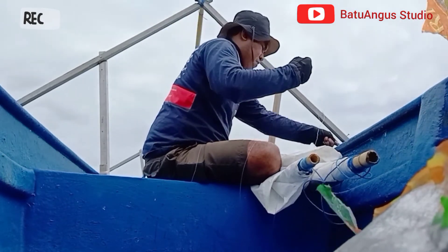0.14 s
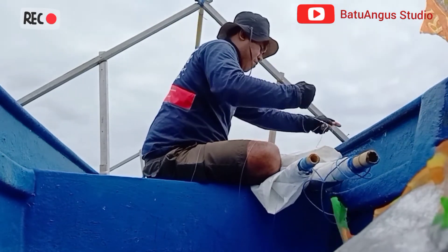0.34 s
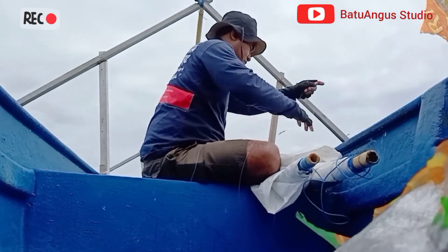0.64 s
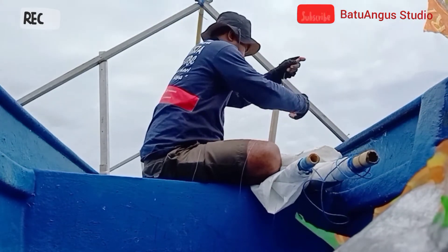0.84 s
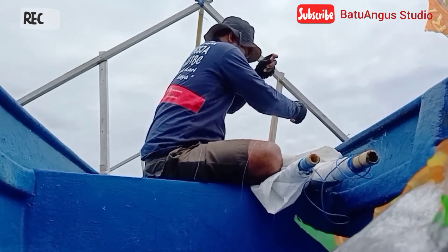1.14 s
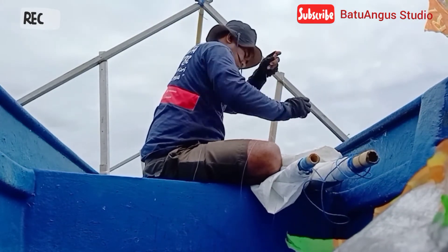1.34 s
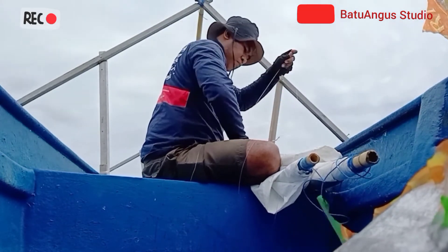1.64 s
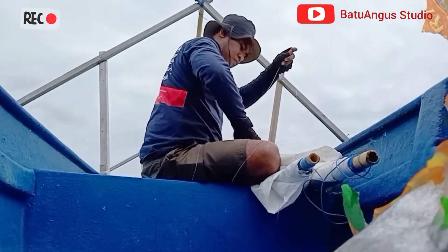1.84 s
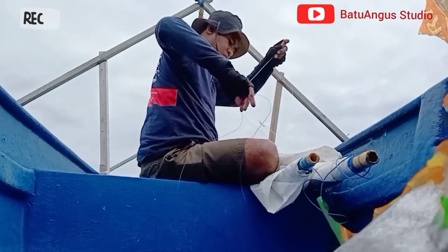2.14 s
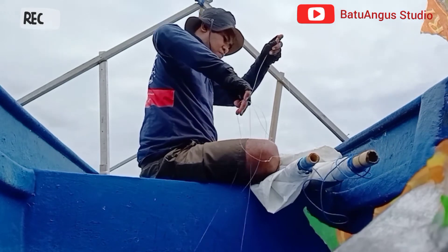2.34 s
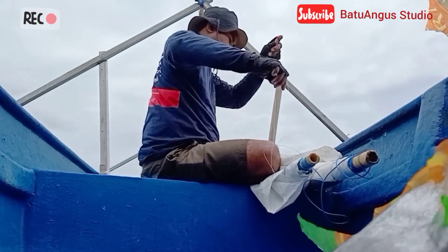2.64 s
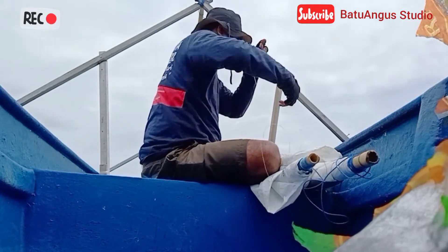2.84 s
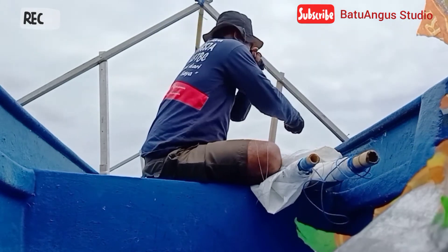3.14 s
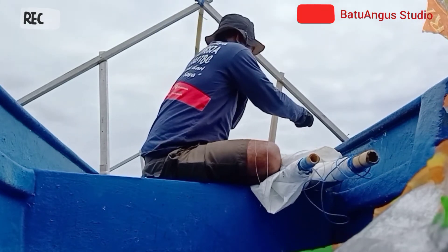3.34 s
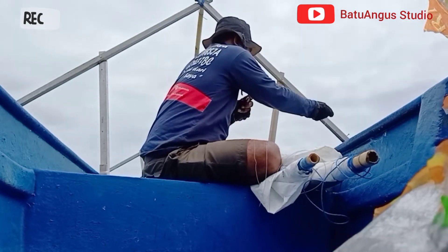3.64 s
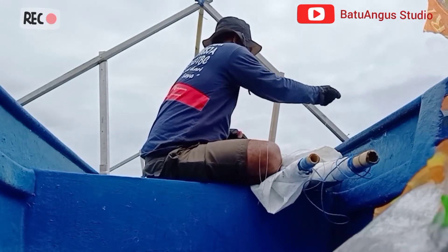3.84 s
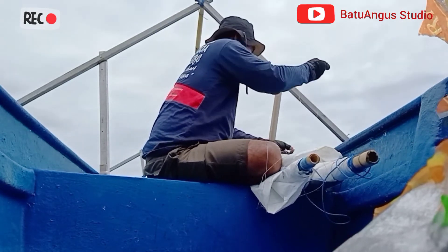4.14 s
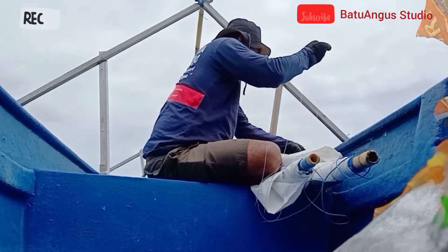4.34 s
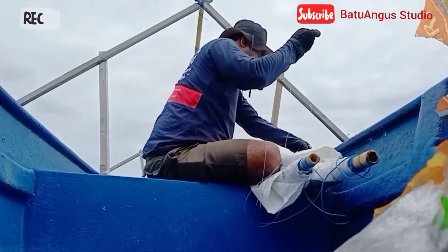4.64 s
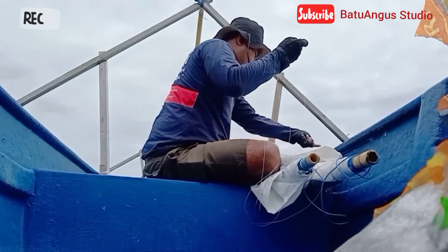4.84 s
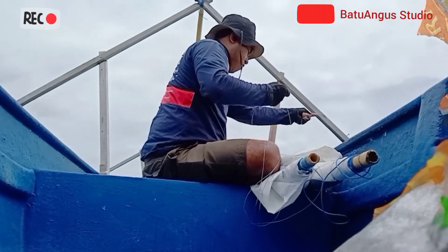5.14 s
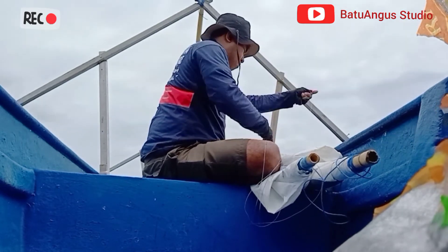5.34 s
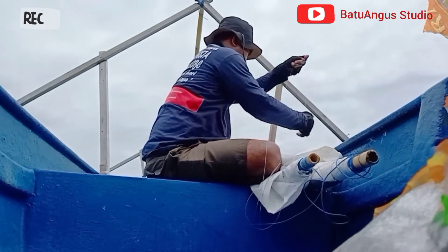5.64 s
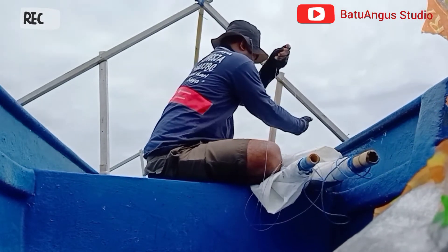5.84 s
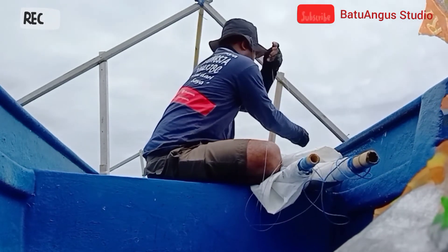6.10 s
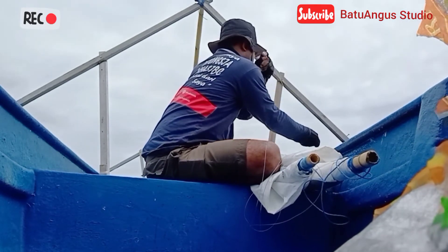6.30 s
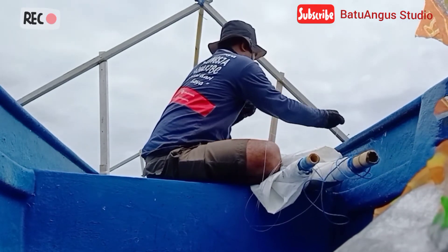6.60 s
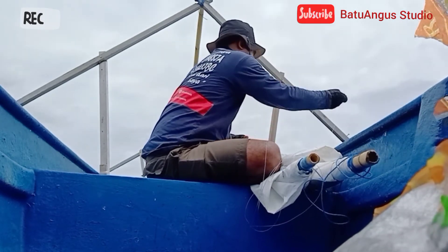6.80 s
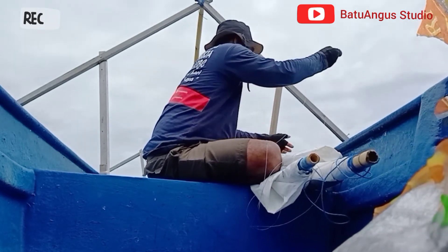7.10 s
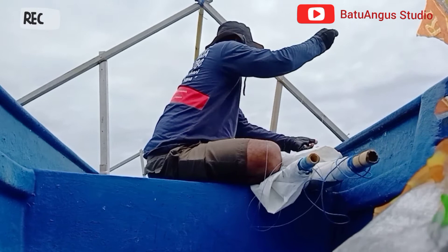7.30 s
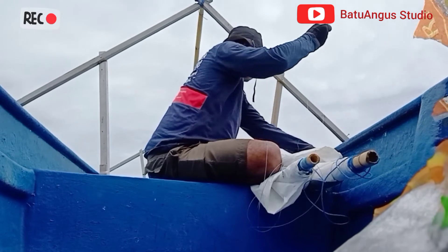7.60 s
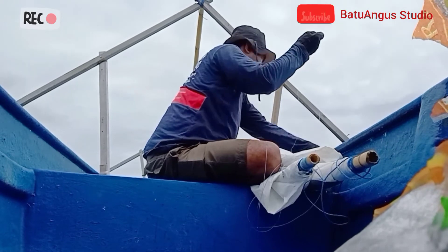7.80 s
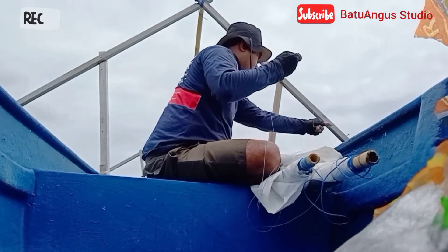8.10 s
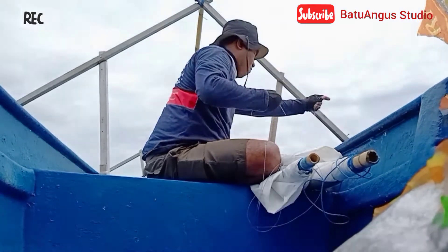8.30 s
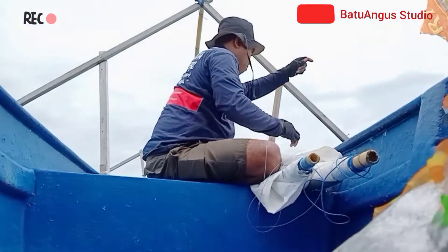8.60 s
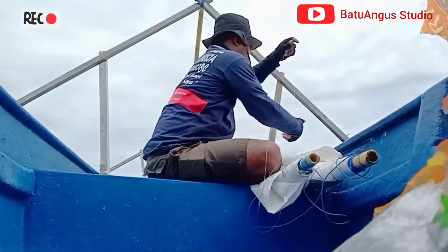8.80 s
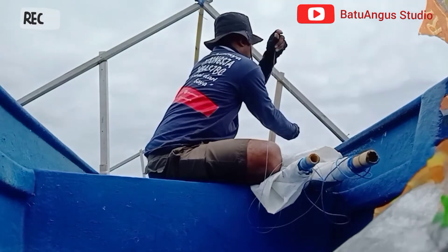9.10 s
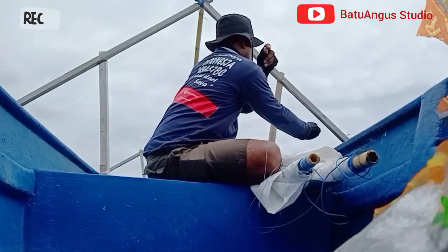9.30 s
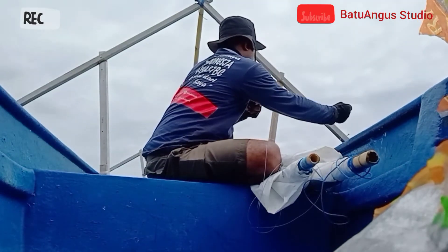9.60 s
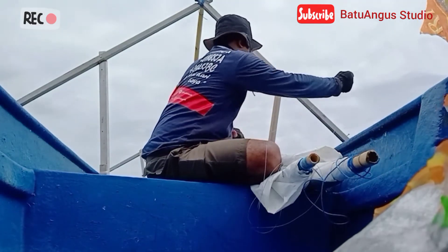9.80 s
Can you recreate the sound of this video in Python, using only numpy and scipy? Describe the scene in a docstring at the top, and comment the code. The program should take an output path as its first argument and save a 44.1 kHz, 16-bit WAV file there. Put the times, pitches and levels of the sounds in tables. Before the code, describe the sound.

Wavelets slap irregularly against a small wooden boat's hull, with hollow knocks, short splashes, brief air glugs and a very faint water wash.

```python
"""At the bottom boards of a small wooden boat at rest on a short chop, wavelets slap the planking.
Each slap is a train of pressure clicks that excites hull modes (knock), the hollow (thud) and drops (splash, spray).
Water washes faintly along the sides as shaped noise; trapped air glugs as sliding tones; fine drops spatter.
Two microphone ports hear each slap with a lag and a treble shade set by the side it strikes."""
import sys
import numpy as np
from scipy import signal
from scipy.fft import rfft, irfft, next_fast_len
from scipy.io import wavfile
from scipy.ndimage import uniform_filter1d

SR = 44100
rng = np.random.default_rng(int(sys.argv[2]) if len(sys.argv) > 2 else 0)


def to_wav(sig):
    """Store sig (one row per channel, or 1-D mono) as 16-bit WAV at the path in sys.argv[1].

    Samples outside -1..1 are clipped; the rate is SR.
    """
    pcm = np.clip(np.atleast_2d(sig), -1, 1) * 32767
    pcm = np.round(pcm).astype(np.int16)
    wavfile.write(sys.argv[1], SR, pcm.T)  # frames by channels


N = 438794
SPAN = 12000   # samples rendered for one slap or spatter
SPAN_HZ = np.arange(SPAN // 2 + 1) * SR / SPAN   # frequencies of its spectrum

# vibration modes of the planking: (frequency [Hz], relative level [dB], t60 [s])
PLANK_MODES = [(258.9, 3, 0.26), (301.9, 0, 0.23), (328, 1, 0.28), (387, -1, 0.18), (434.5, 0, 0.11),
               (478.9, -2, 0.22), (502, -6.5, 0.17), (545.2, 0.5, 0.1), (611.8, 4, 0.12), (690, 5, 0.038),
               (757, 0.5, 0.12), (831, 7, 0.035), (946.3, 4, 0.13), (1050, 16.5, 0.024)]
# resonances of the hollow of the hull: (frequency [Hz], relative level [dB], t60 [s])
HOLLOW_MODES = [(55.6, 0, 0.57), (91.3, -14, 0.52), (120.6, -5, 0.24), (146.5, 1, 0.09), (184.2, 3, 0.26),
                (233.6, 2, 0.074)]


def from_db(db):
    """Level as amplitude: decibels to gain."""
    return 10 ** (np.asarray(db) / 20)


def at_hz(points, hz):
    """Spectral envelope: dB points joined over log frequency, as gain, silent outside the ends."""
    points = np.array(points)
    level_db = np.interp(np.log(hz + 1), np.log(points[:, 0]), points[:, 1], -200, -200)
    return from_db(level_db)


def modes(table, hz):
    """Damped resonance: complex response of each decaying mode, one row a mode."""
    mode_hz, level_db, t60 = np.array(table).T[:, :, None]
    damping = np.log(1000) / t60
    return from_db(level_db) * mode_hz / ((damping + 2j * np.pi * hz) ** 2 + (2 * np.pi * mode_hz) ** 2)


def drift(rate_hz):
    """Low-passed noise: slow chance of spread 1, computed at every 40th sample."""
    r = np.exp(-80 * np.pi * rate_hz / SR)
    white = rng.standard_normal(N // 40 + 2002)
    slow = signal.lfilter([1], [1, -2 * r, r * r], white)[2000:]
    return np.interp(np.arange(N) / 40, np.arange(len(slow)), slow / slow.std())


def patchy_noise(colour, alike, patchy_db):
    """Partial coherence: coloured noise partly shared by the ports, swelling by chance; rms 1."""
    mid, side = rng.standard_normal((2, N))
    white = np.sqrt(1 + alike) * mid + np.sqrt(1 - alike) * side * [[1], [-1]]
    size = next_fast_len(N)
    hz = np.arange(size // 2 + 1) * SR / size
    noise = irfft(rfft(white, size) * colour(hz), size)[:, :N]
    noise *= from_db(patchy_db * drift(12.0))
    return noise / noise.std()


def laps(per_s, spread_db, dies_s):
    """Shot noise: tiny ripples at random moments, sudden swells that die away exponentially."""
    sizes = (rng.random(N) < per_s / SR) * from_db(spread_db * rng.standard_normal(N))
    return signal.lfilter([1], [1, -np.exp(-1 / (dies_s * SR))], sizes + 1e-18)


def stirred(slapped, rest_db, stirred_db, slope, settle_s):
    """Relaxation: recent slap power, raised to a slope in dB per dB, adds to a resting level.

    stirred_db is the added level when the recent slap level is 0 dB."""
    r = np.exp(-1 / (settle_s * SR))
    lately = signal.lfilter([1 - r], [1, -r], np.mean(slapped ** 2, axis=0))
    return np.hypot(from_db(rest_db), from_db(stirred_db) * lately ** (slope / 2))


def wash(slapped):
    """Flow noise: water sliding along the planks keeps their modes humming and trickles on top."""
    # spectrum of the hum along the hull: (frequency [Hz], relative density [dB])
    hull_spectrum = [(15, -46), (25, 4), (179, -0.5), (270, -2.5), (321, -2.5), (375, -3.5), (637, -8),
                     (852, -28.5), (1500, -45), (3300, -120)]
    # spectrum of the trickle: (frequency [Hz], relative density [dB])
    trickle_spectrum = [(590, -7), (1000, -4.5), (1320, -11.5), (2540, -8), (3300, -20.5), (5350, -24),
                        (7210, -19.5), (11400, -28), (15600, -37)]
    # how busily the water runs along the sides: (time [s], gain on the trickle [dB])
    busy = [(0, -10), (.5, -10.5), (1.3, -2.5), (2.5, -0.5), (3.203, -11), (4.0, -5), (5.05, -10.5),
            (5.5, -5), (6.4, -14.5), (7.3, -3), (8.7, -16.5)]

    def hum(hz):
        """Resonant filtering: the wash spectrum, lifted at the modes."""
        ringing = np.abs(modes(PLANK_MODES + HOLLOW_MODES, hz)).max(axis=0)
        lift = ringing / uniform_filter1d(ringing, size=2000)
        return at_hz(hull_spectrum, hz) * lift ** 0.38

    hull = patchy_noise(hum, alike=.75, patchy_db=1.5)
    trickle = patchy_noise(lambda hz: at_hz(trickle_spectrum, hz), alike=.2, patchy_db=1.0)
    trickle *= 1 + laps(per_s=9, spread_db=4, dies_s=.025)
    trickle *= from_db(np.interp(np.arange(N) / SR, *np.transpose(busy)))
    hull_level = stirred(slapped, rest_db=-65, stirred_db=-33, slope=1.8, settle_s=.01)
    # so steep a slope leaves the trickle near rest unless slaps are very loud
    trickle_level = stirred(slapped, rest_db=-64.5, stirred_db=-42, slope=8, settle_s=8)
    return hull_level * hull + trickle_level * trickle


def push(dies_s, per_s, spread_db, rise_s, bend, first_db, surge_db):
    """Impulsive loading: spectra of uneven, surging pressure clicks that rise fast and fall, with one main blow.

    The fall reaches 60 dB at dies_s; a bend above 1 steepens it as it goes, below 1 eases it."""
    surge_samples = 400
    rise_power, usual_push_s = 0.59, 0.2   # a longer push also rises more slowly
    blow_after_rises = 1.2   # the main blow lands once the water has begun to press
    t = np.arange(SPAN) / SR
    count = len(dies_s)
    draw = (2 * rng.random((count, SPAN)) - 1) * SR / per_s   # within +-1 marks a click
    size_db = -spread_db * np.log(np.minimum(np.abs(draw), 1) + .02)
    clicks = (np.abs(draw) < 1) * np.sign(draw) * from_db(size_db)
    surges = np.repeat(rng.standard_normal((count, SPAN // surge_samples)), surge_samples, axis=1)
    clicks *= from_db(surge_db * uniform_filter1d(surges, size=surge_samples // 2))
    rise_s = rise_s * (dies_s[:, None] / usual_push_s) ** rise_power
    fall_db = np.maximum(-60 * (t / dies_s[:, None]) ** bend, -200)
    clicks *= (1 - np.exp(-t / rise_s)) * from_db(fall_db)
    clicks *= np.clip(4 - 5 * t * SR / SPAN, 0, 1)   # leaves the last fifth free for ringing
    blow_at = (blow_after_rises * rise_s[:, 0] * SR).astype(int)
    clicks[np.arange(count), blow_at] = from_db(first_db)
    return rfft(clicks)


def hard_blows(s, level_db):
    """Impulse excitation: hardest blows, where the wavelet closes on the wood, as spectra per slap."""
    # moments of the hardest blows inside the stronger slaps: (time [s])
    blow_s = np.array([.583, .707, .934, 0.952, 1.431, 1.648, 1.802, 2.081, 2.235, 2.992, 3.36, 3.566, 3.65,
                       4.221, 4.352, 4.364, 4.676, 4.788, 5.169, 5.769, 5.872, 5.925, 5.995, 6.157, 6.765,
                       6.877, 6.952, 7.022, 7.107, 7.217, 7.542, 7.554, 7.567, 7.603, 8.453, 8.515, 8.789,
                       8.906, 8.991, 9.055, 9.065, 9.251, 9.636])
    clicks = np.zeros((len(s), SPAN))
    slap = np.searchsorted(s, blow_s) - 1   # the latest slap begun
    clicks[slap, ((blow_s - s[slap]) * SR).astype(int)] = from_db(level_db)
    return rfft(clicks)


def struck(table, centre_hz, width_octaves, chance_db, unlike):
    """Modal superposition: modes near the centre are favoured, each met by chance, unlike at the two ports."""
    alike_below_hz = 820   # below this, the lower the mode the more alike it reaches both ports
    mode_hz = np.array(table)[:, 0]
    octaves = np.log2(mode_hz / centre_hz[:, None])
    chance = from_db(chance_db * rng.standard_normal(octaves.shape))
    near = chance / (1 + np.abs(octaves / width_octaves) ** 3)
    port_spread = unlike * np.minimum(mode_hz / alike_below_hz, 1)
    ports = 1 + port_spread * rng.standard_normal((len(near), 2, len(table)))
    share = near[:, None] * ports * (-1) ** np.arange(len(table))   # neighbours in opposite phase
    return share @ modes(table, SPAN_HZ)


def droplets(centre_hz, width_octaves):
    """Scaled resonance: small drops ring 25 cycles to t60 at any size, tilted up 6 dB an octave."""
    table = [(pitch, 0, 25.0 / pitch) for pitch in np.geomspace(3200, 15000, num=24)]
    return np.arange(SPAN // 2 + 1) * struck(table, centre_hz, width_octaves, chance_db=2.5, unlike=0.55)


def at_level(spectra, level_db):
    """Rms scaling: sets the level of the first 25 ms of each event; spectra are (event, port, Hz)."""
    first = irfft(spectra)[..., :int(.025 * SR)]
    rms = np.sqrt(np.mean(first ** 2, axis=(1, 2)) + 1e-20)
    return spectra * (from_db(level_db) / rms)[:, None, None]


def laid_out(s, spectra):
    """Superposition: adds each event at its time, starting 1 ms early to leave room for port lags."""
    out = np.zeros((2, N + SPAN))
    starts = np.round((s - .001) * SR).astype(int)
    for start, wave in zip(starts, irfft(spectra)):
        out[:, start:start + SPAN] += wave
    return out[:, :N]


def slaps():
    """Forced vibration: each wavelet's push, filtered by modes, gives its knock, thud, splash and spray."""
    # wavelets on the hull; each push scales the fall time, held to .02-.5 s:
    # (time [s], knock [dB], knock centre [Hz], thud [dB], splash [dB], splash centre [Hz], fall time [s],
    #  side struck [1 right, -1 left, 0 amidships])
    wavelets = [(0.003, -43.5, 750, -55.5, -50.5, 2220, 0.19, -1),
                (0.048, -54, 377, -61, -51.5, 2650, 0.17, 0), (0.574, -30.5, 550, -47, -36, 2260, 0.21, 1),
                (0.695, -26.5, 487, -34, -40.5, 1880, 0.23, 1),
                (0.841, -37.5, 614, -48, -35, 1800, 0.21, -1),
                (0.876, -41, 300, -42.5, -56, 1880, 0.31, -1),
                (0.933, -35.5, 304, -39.5, -59.5, 2140, 0.27, -1),
                (0.98, -44.5, 302, -53, -67, 1470, 0.55, -1), (1.088, -41, 556, -51, -77, 2150, 0.16, -1),
                (1.196, -59.5, 905, -68, -59.5, 1800, 0.31, 1), (1.301, -48, 450, -55, -47, 2760, 0.093, 1),
                (1.418, -43.5, 513, -55, -40.5, 2000, 0.25, 1),
                (1.474, -40.5, 360, -45.5, -63, 2110, 0.13, 0),
                (1.559, -57, 1030, -63, -54.5, 2030, 0.64, -1),
                (1.646, -21.5, 930, -51.5, -36.5, 2110, 0.15, 1),
                (1.791, -26.5, 980, -53, -36.5, 2370, 0.18, 1),
                (1.912, -53.5, 660, -67.0, -55, 2300, 0.064, -1),
                (2.014, -46, 546, -59.0, -72, 1970, 0.53, -1),
                (2.064, -29, 408, -35, -47.5, 2060, 0.19, -1), (2.127, -41, 660, -53, -50, 2130, 0.66, -1),
                (2.219, -30.5, 494, -42, -39, 2400, 0.25, -1), (2.309, -41, 780, -55, -49, 2150, 0.14, -1),
                (2.396, -53, 920, -65, -49.5, 2350, 0.098, -1),
                (2.467, -54.5, 770, -69, -54, 2070, 0.52, -1),
                (2.681, -45, 330, -55.5, -57.5, 2060, 0.3, -1),
                (2.897, -41, 543, -36.5, -51, 1950, 0.48, 1),
                (2.981, -23.5, 440, -34, -43.5, 2090, 0.13, 1),
                (3.097, -50, 418, -46, -58.5, 2200, 0.096, 0),
                (3.157, -55, 576, -45.5, -83.0, 2200, 0.074, 1), (3.329, -47, 710, -48, -39, 2640, 0.2, -1),
                (3.349, -17.5, 323, -34.5, -52, 2530, 0.18, -1),
                (3.498, -38.5, 325, -45, -72, 2450, 0.56, 0), (3.525, -51, 331, -49, -56, 2820, 0.18, 0),
                (3.555, -30.5, 573, -41, -47, 2280, 0.42, 0), (3.633, -34, 526, -37, -46.5, 1690, 0.19, -1),
                (3.924, -94, 1150, -80, -61, 2030, 0.089, 0), (4.143, -57, 513, -73, -53.5, 2360, 0.2, 1),
                (4.206, -33, 770, -45, -52, 1610, 0.18, 1), (4.237, -36, 266, -38.5, -46.0, 2490, 0.48, 1),
                (4.318, -45, 700, -56, -42, 2470, 0.15, 1), (4.348, -20, 370, -36.5, -39.5, 2180, 0.2, 1),
                (4.392, -38, 326, -37, -43.5, 2400, 0.26, 1), (4.45, -42.5, 350, -67, -41, 2400, 0.16, 1),
                (4.517, -56, 910, -55, -52, 2670, 0.18, 1), (4.633, -40.5, 765, -48, -53.5, 2080, 0.26, 1),
                (4.665, -25, 577, -39.5, -54.5, 1540, 0.17, -1),
                (4.771, -32.5, 800, -59.5, -50.5, 2260, 0.39, -1),
                (5.145, -44, 416, -55, -47.5, 2070, 0.21, -1),
                (5.158, -29, 340, -41.5, -51.5, 1820, 0.23, 1), (5.227, -47, 483, -64, -45, 2400, 0.18, -1),
                (5.31, -56, 495, -56.5, -83, 2280, 0.56, -1),
                (5.423, -73.5, 900, -56.5, -59.5, 1930, 0.12, 0),
                (5.571, -56, 450, -65, -57, 2500, 0.091, -1), (5.74, -56.5, 614, -58, -51.5, 1970, 0.26, 1),
                (5.761, -23.5, 400, -28.5, -49, 1950, 0.27, 1),
                (5.827, -40, 460, -48, -42.5, 1950, 0.21, 1), (5.869, -19, 530, -38, -37, 1770, 0.2, 1),
                (5.908, -21, 437, -27.5, -37, 2560, 0.18, -1), (5.955, -38, 415, -48, -40, 1950, 0.34, 0),
                (5.992, -32, 950, -42, -38, 1970, 0.1, 1), (6.047, -46.5, 433, -49, -41.5, 2120, 0.21, -1),
                (6.092, -38, 480, -54, -66, 2200, 0.087, 1),
                (6.148, -31.5, 750, -52.5, -53, 1865, 0.15, -1),
                (6.349, -54, 650, -65, -59.5, 2450, 0.17, -1),
                (6.537, -46.5, 297, -50.5, -50.5, 2510, 0.19, 1),
                (6.753, -39, 421, -49.5, -60, 2400, 0.29, 0), (6.855, -43, 734, -68, -60, 1600, 0.14, 1),
                (6.87, -37, 980, -78, -58, 1690, 0.21, 1), (6.949, -42, 850, -64, -57, 2160, 0.13, 0),
                (7.02, -36, 1100, -80, -67.5, 1640, 0.23, 1), (7.103, -36, 540, -45, -54.5, 2100, 0.29, 1),
                (7.166, -54, 573, -63, -52.5, 2540, 0.14, 0), (7.198, -40, 450, -59.5, -53, 1800, 0.31, -1),
                (7.357, -51.5, 540, -57.5, -58, 2600, 0.39, 0),
                (7.48, -40.5, 606, -47, -48.5, 1800, 0.64, 1), (7.52, -25, 670, -26, -36, 2130, 0.38, 1),
                (7.541, -19.5, 284, -21, -30, 1890, 0.24, 1),
                (7.598, -21, 273, -21.5, -37.5, 2120, 0.17, 0),
                (7.66, -41.5, 900, -40.5, -44.0, 2150, 0.19, -1),
                (7.754, -42, 1150, -49.5, -96, 1550, 0.13, 1),
                (7.794, -74, 570, -68, -58.5, 2300, 0.089, -1), (8.04, -51, 696, -55.5, -53, 2536, 0.21, 1),
                (8.155, -56, 513, -59, -57.5, 1550, 0.22, -1), (8.231, -51, 880, -80, -94, 2040, 0.17, 1),
                (8.355, -53.5, 426, -80.0, -58, 1600, 0.62, 0),
                (8.435, -31, 277, -36.5, -41.5, 2170, 0.18, 1),
                (8.49, -43.5, 430, -61, -47, 2120, 0.14, -1),
                (8.512, -50.5, 504, -62.0, -49.5, 2150, 0.29, -1),
                (8.621, -53, 765, -64, -48, 2550, 0.28, 1), (8.746, -39.5, 460, -52, -54.5, 1730, 0.14, 1),
                (8.785, -40, 795, -55, -43.5, 2580, 0.26, 1), (8.897, -35, 600, -48.5, -47, 1830, 0.28, 1),
                (8.987, -30, 410, -40, -48, 2240, 0.59, 1), (9.018, -29, 900, -29.5, -41, 1650, 0.44, 1),
                (9.043, -17.5, 304, -22.5, -47.5, 2120, 0.24, -1),
                (9.07, -25.5, 330, -32.5, -39, 1990, 0.23, 1),
                (9.095, -31, 430, -27.5, -35.5, 1650, 0.17, 1),
                (9.244, -30.5, 442, -51, -55.5, 1880, 0.13, 1), (9.31, -47.5, 820, -62, -56, 2120, 0.5, -1),
                (9.503, -61, 492, -64, -58.0, 2360, 0.35, -1), (9.544, -47, 570, -61, -49, 2280, 0.53, -1),
                (9.627, -32.5, 382, -39, -47, 1850, 0.22, -1), (9.692, -47, 600, -66, -47, 1780, 0.2, -1),
                (9.77, -40, 560, -53, -57.5, 2150, 0.31, -1), (9.83, -40, 383, -66, -54.5, 2110, 0.6, 0),
                (9.884, -65, 330, -54, -49, 2030, 0.13, -1)]
    # spectrum of the splash: (frequency [Hz], relative density [dB])
    splash_spectrum = [(700, 12.5), (1300, -5), (2700, 0), (3300, -10.5), (6000, -62)]
    # spectrum of the spray: (frequency [Hz], relative density [dB])
    spray_spectrum = [(1760, -26.5), (3000, -9.5), (4030, -5), (5240, -12), (7290, -5), (11400, -20),
                      (15600, -27.5)]
    # how fine the spray flies, changing slowly with the chop: (time [s], spray over splash [dB])
    fineness = [(0, -9), (.8, -19), (2.3, -11), (4.3, -11), (5.2, -13), (5.9, -11.5), (6.6, -12),
                (8.4, -13.5), (9.0, -13), (9.9, -14)]
    spray_chance_db, spray_per_knock = 1, 0.071   # the second: dB per dB of knock over splash
    lean_db, lean_chance_db = -0.73, 1.5   # left minus right, and its spread from slap to slap
    port_lag_ms = 0.45   # the far port hears a slap on one side this much later
    shade_full_db, shade_from_hz = -1, 700   # left minus right in the treble of a slap on the right
    soft_over_centre = 2.9   # water is a soft hammer: the knock dulls above this multiple of its centre

    s, knock_db, knock_hz, thud_db, splash_db, splash_hz, dies_s, struck_side = np.array(wavelets).T
    pan_chance, spray_chance = rng.standard_normal((len(s), 2)).T
    spray_db = splash_db + np.interp(s, *np.transpose(fineness)) + spray_chance_db * spray_chance
    spray_db += spray_per_knock * (knock_db - splash_db)
    dies_s = np.clip(dies_s, .02, .5)

    blow = push(0.88 * dies_s, per_s=700, spread_db=5.0, rise_s=0.001847, bend=0.98, first_db=10.0, surge_db=4.0)
    blow = blow + hard_blows(s, level_db=19)
    soft = 1 / (1 + 1j * SPAN_HZ / (soft_over_centre * knock_hz[:, None])) ** 2
    # air caught under the wavelet sounds for a few cycles, the planks ring on
    pocket = modes([(pitch, 14, 12.0 / pitch) for pitch in knock_hz], SPAN_HZ)[:, None]
    planks = struck(PLANK_MODES, knock_hz, width_octaves=0.84, chance_db=2.5, unlike=1.0)
    knock = (blow * soft)[:, None] * (pocket + planks)

    # the hollow takes the slower shove of the whole wavelet
    shove = push(0.63 * dies_s, per_s=650, spread_db=5.0, rise_s=0.0027, bend=1.37, first_db=9.5, surge_db=0.0)
    shove = shove + hard_blows(s, level_db=11.5)
    hollow = struck(HOLLOW_MODES, 170 + 0 * s, width_octaves=1.0, chance_db=2.5, unlike=0.24)
    thud = shove[:, None] * hollow

    # drops burst all along the wavelet, so the ports share only part of them
    shared = push(0.49 * dies_s, per_s=250, spread_db=6.5, rise_s=0.0016, bend=0.81, first_db=12.0, surge_db=0.5)
    shared = (shared + hard_blows(s, level_db=17.5))[:, None]
    twice = np.repeat(dies_s, 2)   # one push a port
    own = push(0.95 * twice, per_s=1800, spread_db=4.0, rise_s=0.0053, bend=0.98, first_db=-3.5, surge_db=2.0)
    own = own.reshape(len(s), 2, -1)
    mist = push(0.93 * twice, per_s=3400, spread_db=0.5, rise_s=0.01, bend=0.97, first_db=-9.5, surge_db=2.0)
    mist = mist.reshape(len(s), 2, -1)
    # trapped air rings a set number of cycles at any size
    bubbles = [(pitch, 0, 22.0 / pitch) for pitch in np.geomspace(1300, 3000, num=20)]
    ringing = struck(bubbles, splash_hz, width_octaves=0.63, chance_db=2.5, unlike=0.54)
    splash = (0.44 * shared + own) * at_hz(splash_spectrum, SPAN_HZ) * ringing
    drops = droplets(7000 + 0 * s, width_octaves=4.4)
    spray = (0.24 * shared + mist) * at_hz(spray_spectrum, SPAN_HZ) * drops

    whole = at_level(knock, knock_db) + at_level(thud, thud_db)
    whole += at_level(splash, splash_db) + at_level(spray, spray_db)
    # the nearer port hears the slap earlier
    port = np.array([.5, -.5])[:, None]   # left, right
    struck_side = struck_side[:, None, None]
    pan_db = (lean_db + lean_chance_db * pan_chance)[:, None, None]
    shade_db = shade_full_db * struck_side * SPAN_HZ ** 2 / (SPAN_HZ ** 2 + shade_from_hz ** 2)
    delay_ms = port * port_lag_ms * struck_side + 1
    late = np.exp(-2j * np.pi * SPAN_HZ * delay_ms / 1000)
    return laid_out(s, whole * late * from_db(port * (pan_db + shade_db)))


def glugs():
    """Bubble resonance: air pockets sing as water closes or opens them, rough tones whose pitch slides."""
    # air pockets: (loudest time [s], peak before wavering [dB], start pitch [Hz], end pitch [Hz],
    #  time from loudest to silence [s])
    pockets = [(0.162, -50.5, 339, 335, 0.081), (0.3, -48, 645, 653, 0.045), (0.06, -38, 2690, 2560, 0.028),
               (0.826, -36.5, 1100, 1050, 0.045), (0.917, -53, 2750, 2840, .03),
               (0.99, -52, 1370, 1370, 0.041), (1.022, -33.5, 309, 328, .035),
               (1.23, -45, 1750, 1740, 0.039), (1.363, -54, 381, 406, 0.056),
               (2.159, -34.5, 783, 680, 0.046), (3.214, -38.5, 311, 462, 0.068),
               (3.566, -19.5, 557, 592, 0.024), (3.864, -51, 1830, 1710, 0.033),
               (4.525, -45, 325, 316, 0.2), (5.35, -41, 506, 498, 0.092), (6.97, -39, 816, 870, .035),
               (7.861, -51.5, 460, 454, 0.034), (7.939, -56.5, 621, 630, 0.047),
               (8.008, -56, 580, 587, .055), (8.088, -50, 700, 694, 0.074), (8.907, -36, 896, 894, 0.021),
               (9.862, -27, 329.5, 327, 0.084)]
    out = np.zeros((2, N))
    waver, wobble = drift(90), drift(70)   # of level and of phase
    lags = rng.uniform(-0.49, 1, len(pockets))
    for (s, peak_db, start_hz, end_hz, length_s), lag in zip(pockets, lags):
        at = np.arange(int((s - .4 * length_s) * SR), min(int((s + length_s) * SR), N))
        gone = (at / SR - s) / length_s + .4   # 0 at birth, loudest at .4, pitch settled at 1, silent at 1.4
        turns = np.cumsum(start_hz * (end_hz / start_hz) ** np.minimum(gone, 1)) / SR
        turns += .11 * wobble[at]
        swell = gone / .4 * np.exp(1 - gone / .4) * np.clip((1.4 - gone) / .8, 0, 1)
        apart = lag * 0.00018 * end_hz * np.array([[1], [-1]])   # turns by which one port leads
        out[:, at] += from_db(peak_db + 3.0 * waver[at]) * swell * np.sin(2 * np.pi * (turns + apart))
    return out


def spatters():
    """Granular impact noise: fine drops thrown on the wood, short bright bursts each around its own pitch."""
    # bursts of fine drops: (time [s], level [dB], centre [Hz])
    bursts = [(1.025, -65.5, 5000), (1.464, -62, 6430), (2.861, -65, 4550), (7.153, -59.5, 4460),
              (8.412, -62, 5200), (8.655, -58, 6650), (9.188, -55.5, 6500)]
    s, level_db, centre_hz = np.array(bursts).T
    dies_s = np.full(2 * len(s), 0.28)   # one push a port
    fall = push(dies_s, per_s=3900, spread_db=5.5, rise_s=0.004, bend=1.0, first_db=22.0, surge_db=3.0)
    drops = fall.reshape(len(s), 2, -1) * droplets(centre_hz, width_octaves=0.35)
    return laid_out(s, at_level(drops, level_db))


def scene():
    """Linear superposition: slaps, spatters and glugs over the wash that the slaps stir."""
    slapped = slaps()
    return slapped + spatters() + glugs() + wash(slapped)


def record(dry):
    """Band limiting: the microphones lose the deepest bass below 46 Hz; the top is cut at 15.6 kHz."""
    bass_cut = signal.butter(4, 46, "high", fs=SR, output="sos")
    top_cut = signal.ellip(10, .5, 70, 15600, fs=SR, output="sos")   # .5 dB ripple, 70 dB stop
    thin = signal.sosfilt(bass_cut, dry)
    return signal.sosfilt(top_cut, thin)


dry = scene()
out = record(dry)
to_wav(out)
```